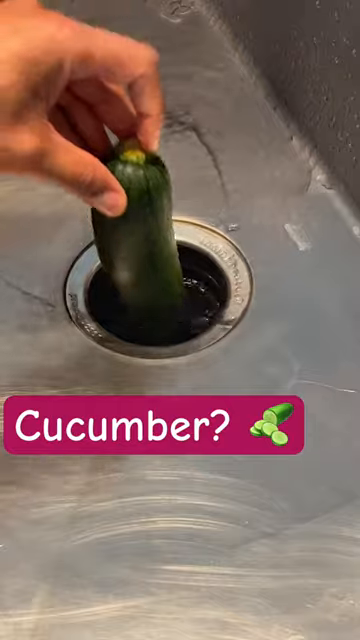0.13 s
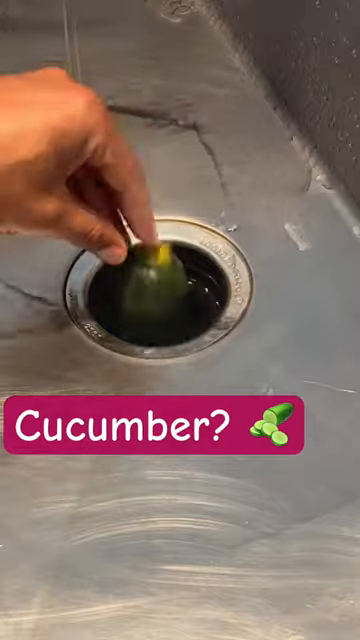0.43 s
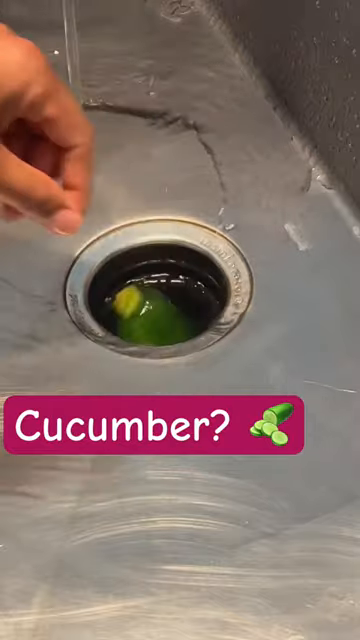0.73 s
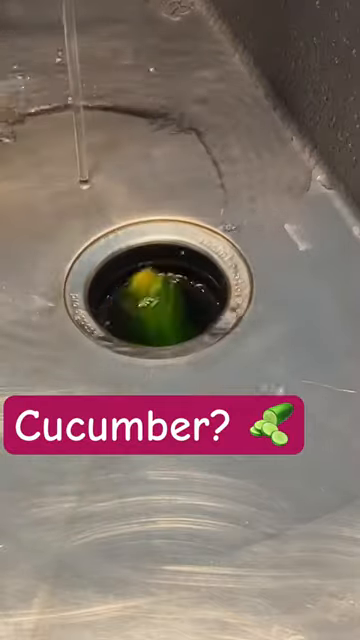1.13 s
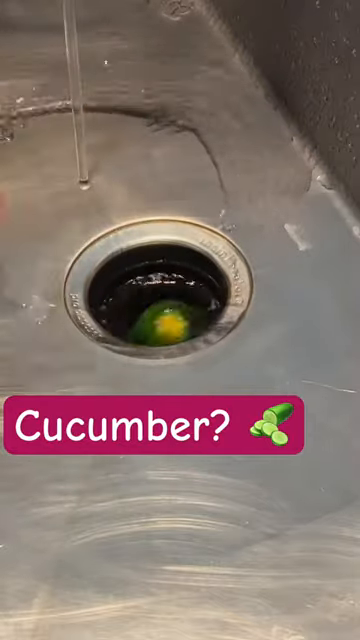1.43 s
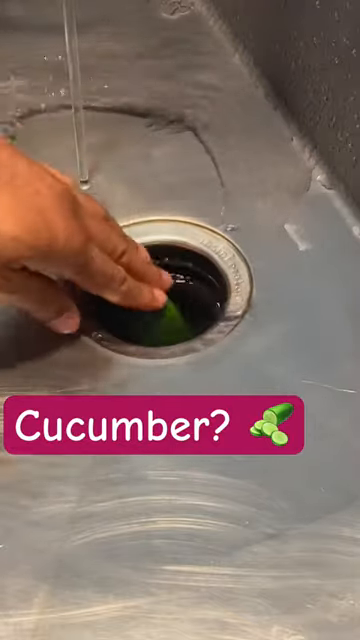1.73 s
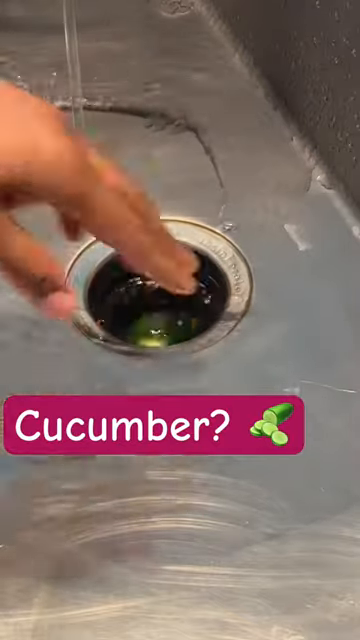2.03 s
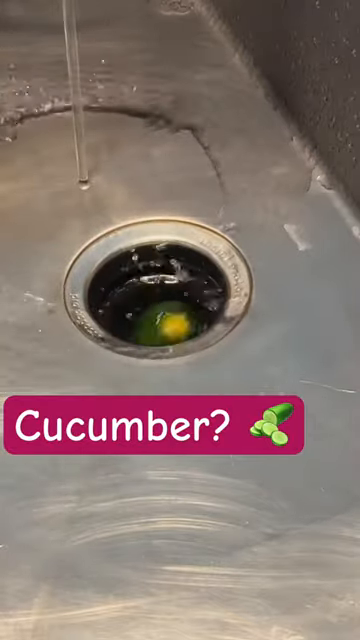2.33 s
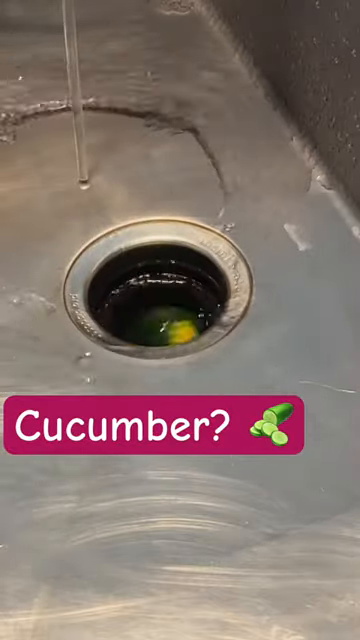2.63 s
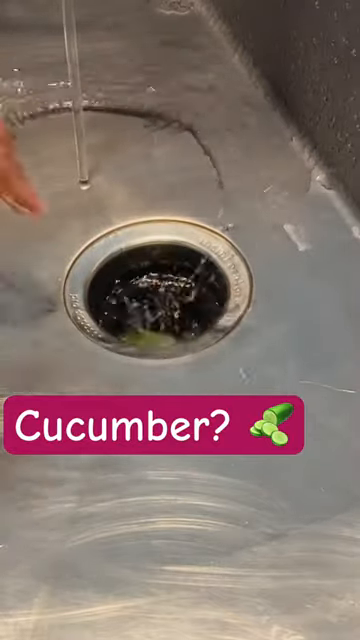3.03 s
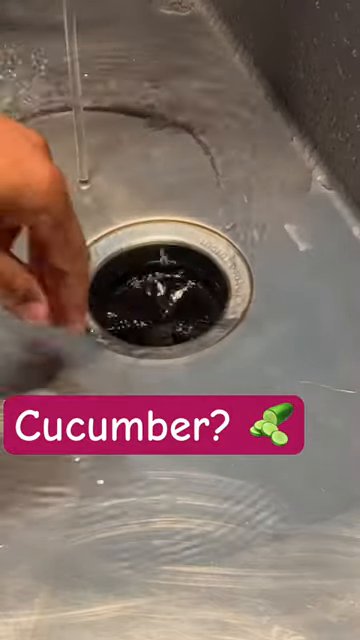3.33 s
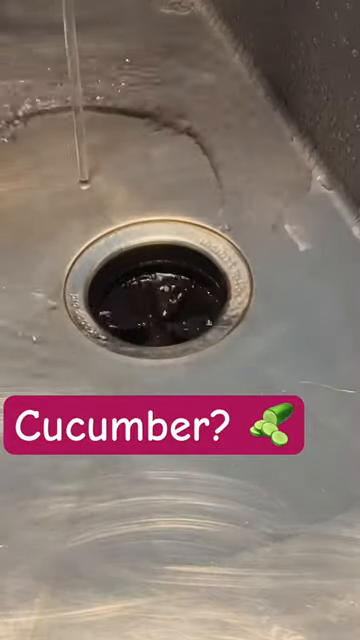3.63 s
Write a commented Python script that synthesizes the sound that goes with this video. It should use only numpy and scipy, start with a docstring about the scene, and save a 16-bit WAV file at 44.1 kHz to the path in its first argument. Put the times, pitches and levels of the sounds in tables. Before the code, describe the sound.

Close to a steel kitchen sink, a garbage disposal runs with a low motor hum, then starts grinding a cucumber. Irregular thumps, wet crunches and small metal clinks build to a heavy burst while water fizzes softly.

```python
"""Cucumber in the waste disposal

A sink disposal runs under a trickle of tap water, close to a phone. The motor hums; a cucumber drops in
and the spinning plate flings it about. Dull thuds boom in the steel basin, the flesh crunches, loose
metal lugs clink and ring, water fizzes and bubbles. The two microphone ports hear the treble out of phase.
"""
import sys
import numpy as np
from scipy import signal
from scipy.fft import rfft, irfft, next_fast_len
from scipy.io import wavfile
from scipy.ndimage import uniform_filter1d, minimum_filter1d, map_coordinates

SR = 44100
rng = np.random.default_rng(int(sys.argv[2]) if len(sys.argv) > 2 else 0)


def unload_audio(sound):
    """Save the sound as a 16-bit wav file, at the path given as the first command line argument."""
    columns = np.transpose(np.atleast_2d(sound))
    # keep every value between -1 and 1, then stretch to whole-number steps
    steps = np.round(np.clip(columns, -1, 1) * 32767)
    wavfile.write(sys.argv[1], SR, steps.astype(np.int16))


N = 167139
T = np.arange(N) / SR

# The cucumber's blows. Each row: start in seconds, relative level in dB.
THUDS = [(0.513, 0.5), (0.543, -2), (0.594, -10), (0.628, -9), (0.658, -12.5), (0.701, -8), (0.756, -2),
         (1.018, -3), (1.106, -5.5), (1.128, -4), (1.171, -26), (1.327, -1), (1.363, -5), (1.393, -12),
         (1.446, -6), (1.475, -12), (1.501, -2), (1.526, -11), (1.678, -10), (1.737, -15), (1.757, -20),
         (1.872, -4.5), (1.898, -18), (1.916, -8), (1.943, 2), (1.97, -5), (2.021, -2.5), (2.058, 0.5),
         (2.074, -1), (2.109, -4), (2.251, -1), (2.277, -1.5), (2.301, -2), (2.368, -13), (2.396, -6.5),
         (2.486, -11.0), (2.723, -3), (2.76, -8), (2.959, -6), (2.981, -4), (3.016, 6), (3.047, 7.5),
         (3.069, 8.5), (3.097, -18), (3.145, 4.5), (3.165, 3), (3.19, -7), (3.225, -1.5), (3.26, 1),
         (3.301, 1.5), (3.325, -5.5), (3.4, -6.5), (3.428, -5), (3.449, -5.5), (3.512, -9.5), (3.778, -3.5)]
# The grinding bed. Each row: time in seconds, then boom, knock and crunch faders in dB.
LOAD_FADERS = [(0.47, -37, -15, -22.5), (0.53, -10, -17.5, -38.5), (0.84, -15.5, -29.5, -44.5),
               (2.26, -7.5, -22.5, -37), (2.55, -21.5, -26, -42.5), (3.27, -7.5, -14, -27.5),
               (3.6, -16.5, -31, -37.5), (3.79, -18, -16, -31.5)]
# The steel basin's ring. Each row: pitch in Hz, width in Hz, gain in dB.
BASIN_MODES = [(75.8, 3.3, -2), (92.7, 10.5, 2), (131.45, 9.8, 2), (163.8, 16.2, -4), (202, 23.4, -4),
               (220, 11.3, -10.5), (291.8, 20.4, -6.5), (331, 9.2, -9.5), (481, 71, -13)]
# The punch of a blow, before the ring. Each row: pitch in Hz, width in Hz, gain in dB.
PUNCH_MODES = [(109, 24, -14.5)]
# The colour of crunching flesh. Each row: frequency in Hz, gain in dB.
CRUNCH_EQ = [(250, -1.5), (480, -3), (650, -6), (880, -12), (1100, -6), (1700, -13.5), (2300, -15.5),
             (5000, -26)]
# Hard lug strikes. Each row: start in seconds, relative level in dB, pitch in Hz, splat send in dB.
CLINKS = [(0.0363, -18, 1970, -21), (0.1633, -8, 2930, -25), (0.2836, -17, 2880, -8),
          (0.4785, -1.5, 2156, -31), (0.5668, -14, 2150, -19), (0.841, -14, 2560, -28),
          (0.879, -16.5, 4400, -14), (1.0567, -12, 2640, -14), (1.1954, -17, 2720, -14),
          (1.288, -11, 3700, -37), (1.326, -20, 2600, -10), (1.382, -12, 2520, -10),
          (1.4272, -11.5, 2120, -20), (1.725, -13, 2650, -17), (1.7472, -19, 2500, -5),
          (1.833, -13, 1200, -14), (1.8657, -10.5, 2140, -17), (1.928, -15, 2640, -11),
          (2.1544, -16, 2500, -13.5), (2.226, -16.5, 3080, -17), (2.243, -14, 1123, -13),
          (2.327, -7, 2860, -17), (2.3985, -15.5, 2650, -9.5), (2.823, -15.5, 2570, -5),
          (2.9117, -15.5, 3000, -8), (3.0087, -20.5, 4030, -0.5), (3.04, -8, 3070, -9),
          (3.1094, -17, 2680, -23), (3.1388, -10, 2140, -30), (3.155, -6, 1180, -35),
          (3.1596, -9.5, 2230, -9.5), (3.223, -19, 3040, -9.5), (3.252, -9, 1150, -14),
          (3.364, -15, 2800, -20), (3.388, -19.5, 2160, -10), (3.6551, -14.5, 2125, -33)]
# The colour of a wet splat. Each row: frequency in Hz, gain in dB.
SPLAT_EQ = [(500, -12), (1200, -8), (3000, 5), (6000, 0), (10000, -6), (16000, -3)]
# The lugs' bright ring. Each row: pitch in Hz, width in Hz, gain in dB.
LUG_MODES = [(1674, 14, -5), (2129, 31, 6.5), (2556, 28, 6.5), (2807, 27, -9), (3130, 37, -10.5)]
# The grinding ring's tone. Each row: pitch in Hz, width in Hz, gain in dB.
RING_MODES = [(1246.8, 12.7, 0)]
# The swell of that tone. Each row: time in seconds, level in dB.
RING_FADER = [(0.04, -40), (1.63, -53.5), (1.81, -39.5), (2.64, -47.5), (3.07, -34), (3.79, -45)]
# The running water. Each row: time in seconds, then spatter and hiss faders in dB.
WATER_FADERS = [(0.04, -43.5, -33.5), (0.14, -36, -33), (0.26, -34.5, -31), (0.38, -38, -34.5),
                (0.48, -31.5, -30.5), (0.64, -37, -35.5), (2.45, -37.5, -34), (2.79, -38, -35.5),
                (3.04, -34, -30.5), (3.28, -40, -37.5), (3.36, -40.5, -33.5), (3.53, -41.5, -36),
                (3.79, -41.5, -39)]
# The colour of the fizz. Each row: frequency in Hz, gain in dB.
FIZZ_EQ = [(300, -41), (650, -1.5), (900, -10.5), (1300, -7.5), (1900, -10), (2700, -2.5), (5000, -2.5),
           (7500, -7), (8500, -3), (10000, -9), (13000, 1), (16000, -5)]
# The motor casing's resonances. Each row: pitch in Hz, width in Hz, rms level in dB.
CASING_MODES = [(328.5, 13, -41.5), (495.8, 6.2, -58.5), (658.7, 25, -53.5), (973, 11.5, -54.5),
                (1077, 17, -59)]
# The stereo twist. Each row: frequency in Hz, left port's phase lead over the right in radians.
PORT_PHASE = [(4100, 0), (4650, -.6), (4910, -1.9), (5250, -5.1), (5700, -6.28), (7500, -6.28),
              (7700, -6.8), (9000, -7.3), (10300, -8), (13300, -9.42), (15000, -9.42), (15300, -9.1)]
# The reflection each port hears alone. Each row: frequency in Hz, gain in dB.
REFLECTION_EQ = [(60, -76), (200, -43), (500, -11.5), (1300, -18.5), (1500, -64), (4000, -47), (4800, -1),
                 (5800, -58), (7400, -62), (8000, -7), (11000, -11), (12800, -10.5), (13400, -50),
                 (16000, -50)]

START_S, DROP_S, FADE_S = .0355, LOAD_FADERS[0][0], .006  # sound starts, cucumber lands, fade-out length


def grinding():
    """The cucumber thuds and bumps against the basin; each thud sets off a burst of crunch."""
    soft_hz, round_hz = 264, 423  # soft flesh excites little treble; the big blows are rounder still
    flesh = lambda hz: 1 / (1 + 1j * hz / soft_hz) ** 4
    basin = lambda hz: modes(BASIN_MODES)(hz) * flesh(hz)
    blow = lambda hz: (basin(hz) + modes(PUNCH_MODES)(hz) * flesh(hz)) / (1 + 1j * hz / round_hz) ** 2
    starts, thud_db = np.transpose(THUDS)
    blow_peak = np.max(abs(filtered(spikes(T[:1], [1.]), blow)))
    polarity = rng.choice([-1, 1], len(starts))
    thuds = filtered(spikes(starts, polarity * amp(thud_db)), blow) / blow_peak
    boom_db, knock_db, crunch_db = curves(LOAD_FADERS)
    boom, knock = split(filtered(scattered(per_s=110, spread_db=1.5), basin), hz=146)
    bumps = amp(-2) * (amp(boom_db) * boom + amp(knock_db) * knock)
    bursts = 1 + .48 * unit(decay(spikes(starts, amp(thud_db)), seconds=.0079))
    crunch = amp(crunch_db) * unit(bursts * patchy_noise(CRUNCH_EQ, patchy_db=2))
    idle_shake = amp(-26.5) * resonant_noise(basin)
    return thuds + (bumps + crunch) * ramp(DROP_S, seconds=.0085) + idle_shake


def clinks():
    """The lugs' hardest strikes: a short, rough metal ring and a splat of water."""
    ring_s, splat_s, attack_s = .036, .042, .0018  # ring and splat fall 60 dB in these times
    out, t = np.zeros(N + SR), T[:SR // 10]
    spray = patchy_noise(SPLAT_EQ, patchy_db=3.5)
    roughness = 1 + .45 * wobble(500)
    attack = 1 - np.exp(-t / attack_s)
    for start, db, hz, splat_db in CLINKS:
        i = round(start * SR)
        ring = amp(-60 * t / ring_s) * np.sin(2 * np.pi * hz * t) * np.resize(roughness[i:], len(t))
        splat = amp(13 + splat_db - 60 * t / splat_s) * np.resize(spray[i:], len(t))
        out[i:i + len(t)] += amp(db - 8.5) * (ring + splat) * attack
    return out[:N]


def lug_rattle():
    """Loose lugs tick against the grinding ring: one held tone, and a jingle that follows the spatter."""
    ticks = lambda: scattered(per_s=250, spread_db=3) + .75 * rng.standard_normal(N)
    tone = amp(curves(RING_FADER)[0]) * unit(filtered(ticks(), modes(RING_MODES)))
    jingle_db = curves(WATER_FADERS)[0] - 5 + 3.2 * wobble(22)
    return tone + amp(jingle_db) * unit(filtered(ticks(), modes(LUG_MODES)))


def tap_water():
    """Fizz that flares in small splashes, with bubbles on top."""
    flares = unit(decay(abs(scattered(per_s=60, spread_db=2)), seconds=.012))
    fizz = (1 + .6 * flares) * patchy_noise(FIZZ_EQ, patchy_db=2.5)
    spatter, hiss = split(fizz, hz=6050)
    spatter_db, hiss_db = curves(WATER_FADERS)
    return amp(spatter_db) * (spatter + amp(-6) * bubbles()) + amp(hiss_db) * hiss


def bubbles(per_s=250, centre_hz=3446, cycles=14):
    """Tiny bubbles ping at random, each a sine that swells and dies in milliseconds."""
    when, size = np.hsplit(rng.random((int(per_s * N / SR), 2)), 2)
    hz = centre_hz * np.exp(.2 * rng.standard_normal(when.shape))
    samples = np.arange(400)
    age = hz * samples / SR / cycles
    pings = amp(-2.5 * np.log(size + .03)) * age * np.exp(-3 * age) * np.sin(2 * np.pi * cycles * age)
    positions = (when * N).astype(int) + samples
    return unit(np.bincount(positions.ravel(), pings.ravel(), N)[:N])


def splash(start_s=.215, rise_s=.02, fall_s=.11):
    """A bright swish as the cucumber crosses the stream."""
    age = np.clip(T - start_s, 0, None)
    swell = (1 - np.exp(-age / rise_s)) * np.exp(-(age / fall_s) ** 2)
    return amp(-31.5) * swell * resonant_noise(resonance(hz=6900, width_hz=3500))


def drain():
    """A thin band of hiss as the drain clears."""
    return amp(-44) * ramp(3.25, seconds=.1) * resonant_noise(resonance(hz=6320, width_hz=400))


def motor(hum_hz=119.3):
    """The windings hum at twice the mains, wavering under load; the casing rings faintly."""
    hum_db = -16 + 3.5 * wobble(11) * (T > DROP_S)
    hum = amp(hum_db) * np.sqrt(2) * np.sin(2 * np.pi * hum_hz * T)
    casing = sum(amp(db) * resonant_noise(lambda f: resonance(hz, width)(f) ** 2)
                 for hz, width, db in CASING_MODES)
    return hum + casing


def amp(db):
    return 10 ** (np.asarray(db) / 20)


def unit(x):
    """x scaled to rms 1."""
    return x / np.sqrt(np.mean(x ** 2) + 1e-20)


def ramp(start_s, seconds):
    """A straight fade-in."""
    return np.clip((T - start_s) / seconds, 0, 1)


def along(points, hz):
    """Read (Hz, value) points on a log frequency axis."""
    knots, values = np.transpose(points)
    return np.interp(np.log(hz + 1), np.log(knots + 1), values)


def curves(rows):
    """One fader curve for each column after the time."""
    times, *columns = np.transpose(rows)
    return [np.interp(T, times, column) for column in columns]


def wobble(per_s):
    """A smooth random curve with per_s knots a second."""
    return map_coordinates(rng.standard_normal(int(N * per_s / SR) + 4), [T * per_s])


def filtered(x, response):
    """x through a complex frequency response."""
    size = next_fast_len(N + SR // 2)
    return irfft(rfft(x, size) * response(np.fft.rfftfreq(size, 1 / SR)), size)[..., :N]


def resonance(hz, width_hz):
    """The response of one ringing band-pass."""
    return lambda f: 1j * f * width_hz / (hz * hz - f * f + 1j * f * width_hz)


def modes(table):
    """The response of a bank of resonances."""
    return lambda f: sum(amp(db) * resonance(hz, width)(f) for hz, width, db in table)


def split(x, hz):
    """The lows and highs of x, each at rms 1."""
    low = filtered(x, lambda f: 1 / (1 + (f / hz) ** 6))
    return unit(low), unit(x - low)


def spikes(times, sizes):
    """Single-sample impulses."""
    return np.bincount(np.clip((times * SR).astype(int), 0, N - 1), sizes, N)


def scattered(per_s, spread_db):
    """Random impulses of uneven size and sign, rms 1."""
    when, size, sign = rng.random((int(per_s * N / SR), 3)).T
    return unit(spikes(when * N / SR, amp(-spread_db * np.log(size + .03)) * np.sign(sign - .5)))


def decay(x, seconds):
    """Give each impulse an exponential tail."""
    return signal.lfilter([1], [1, -np.exp(-1 / (seconds * SR))], x)


def resonant_noise(response):
    """White noise through a response, rms 1."""
    return unit(filtered(rng.standard_normal(N), response))


def patchy_noise(eq, patchy_db):
    """Coloured noise of rms 1 with patches of random gain in time and frequency."""
    spectra = signal.stft(rng.standard_normal(N), nperseg=512)[2]
    patches = uniform_filter1d(uniform_filter1d(rng.standard_normal(spectra.shape), 8, 0), 6, 1)
    mottled = signal.istft(spectra * amp(patchy_db * unit(patches)), nperseg=512)[1][:N]
    return unit(filtered(mottled, lambda hz: amp(along(eq, hz))))


def scene():
    """One mono sink at two ports, which differ in phase and each hear a reflection of their own."""
    sink = motor() + grinding() + lug_rattle() + clinks() + tap_water() + drain() + splash()
    sink *= (T > START_S) * np.clip((T[-1] - T) / FADE_S, 0, 1)
    half_each_way = np.array([[.5j], [-.5j]])
    direct = filtered(sink, lambda hz: np.exp(half_each_way * along(PORT_PHASE, hz)))
    delayed = np.array([np.roll(sink, SR // 40), np.roll(sink, SR // 29)])
    reflections = filtered(delayed, lambda hz: amp(along(REFLECTION_EQ, hz)))
    return direct + reflections * (T > START_S)


def record(dry):
    """Bass roll-off, a peak limiter and a hard top cut."""
    bass_cut_hz, top_hz, ceiling, lookahead_s = 50, 15800, .93, .008
    x = filtered(dry, lambda hz: (1j * hz / (bass_cut_hz + 1j * hz)) ** 4)
    span = int(lookahead_s * SR)
    safe_gain = np.minimum(1, ceiling / (abs(x).max(0) + 1e-9))
    gain = uniform_filter1d(minimum_filter1d(safe_gain, size=2 * span + 1), size=span)
    return filtered(x * gain, lambda hz: hz < top_hz)


dry = scene()
out = record(dry)
unload_audio(out)
```